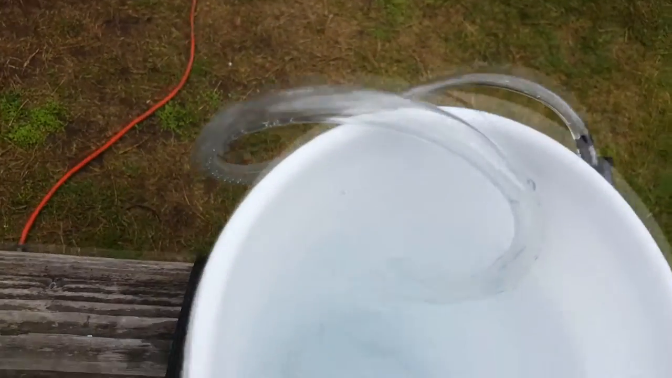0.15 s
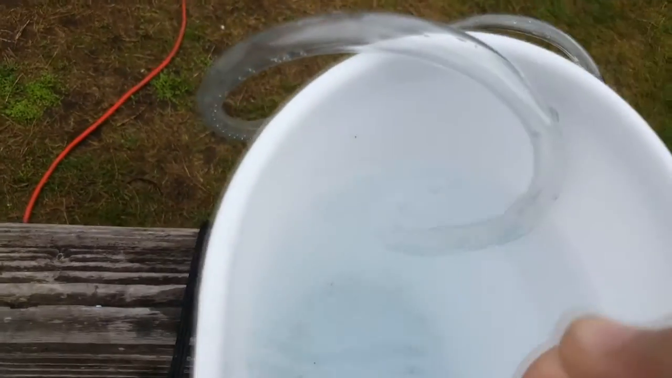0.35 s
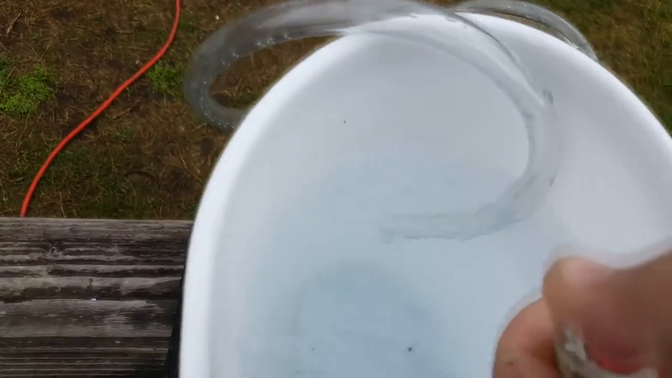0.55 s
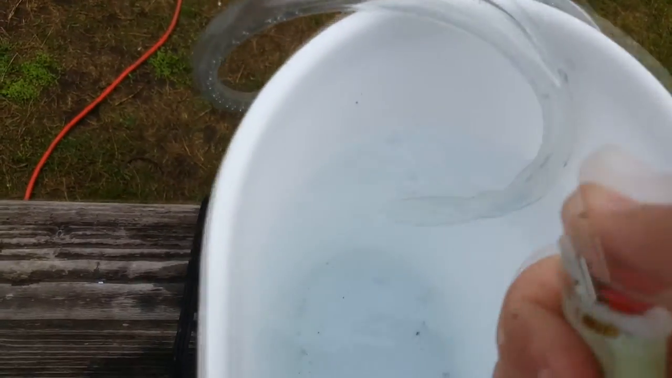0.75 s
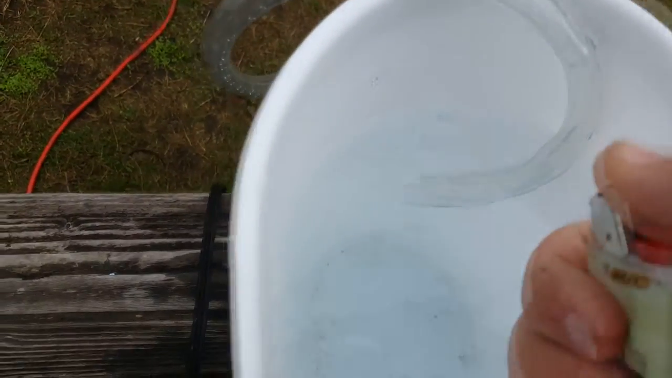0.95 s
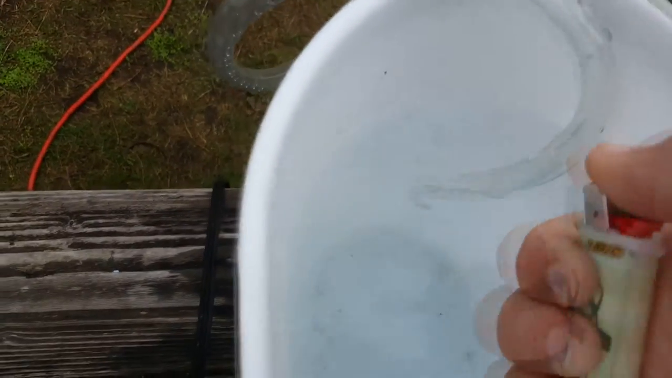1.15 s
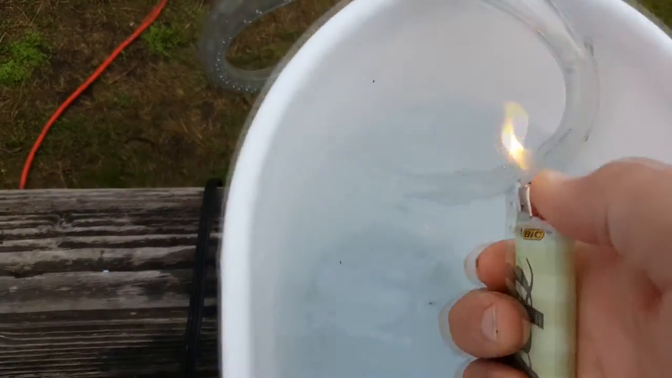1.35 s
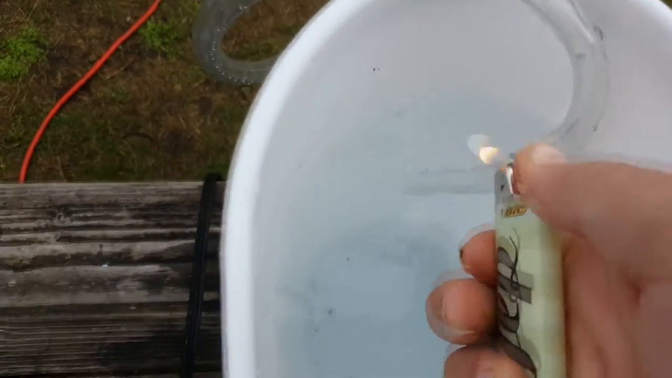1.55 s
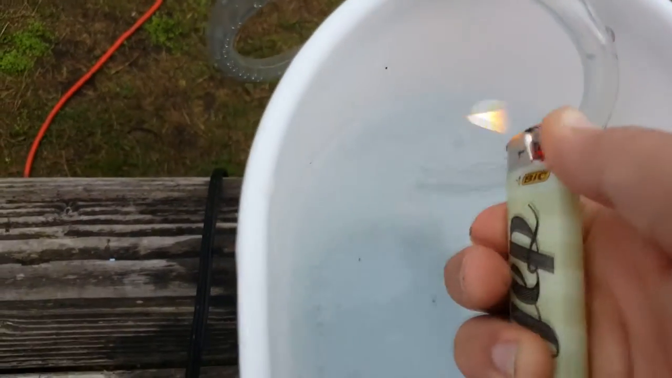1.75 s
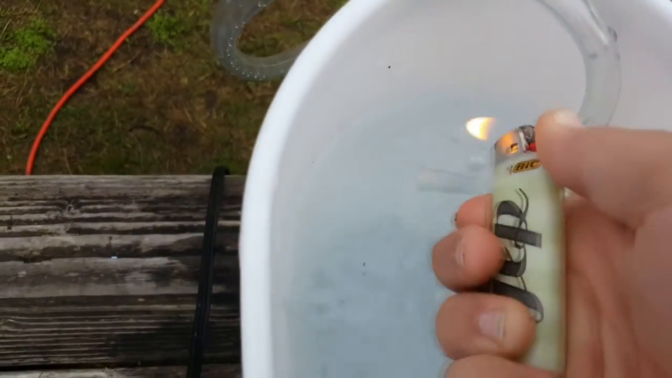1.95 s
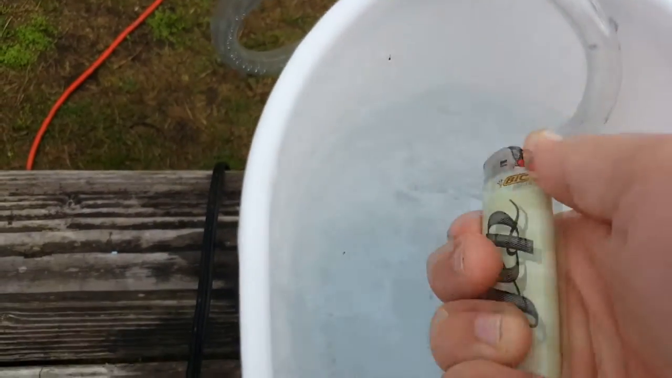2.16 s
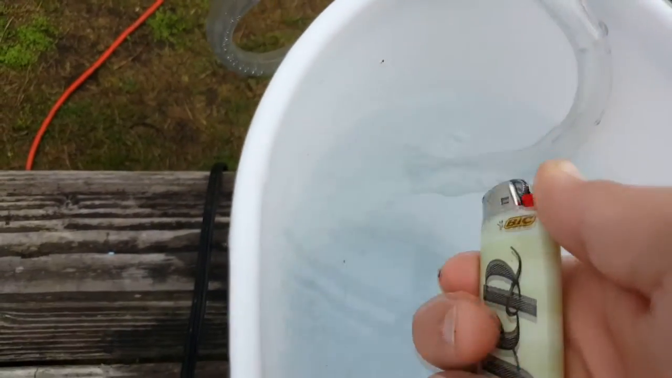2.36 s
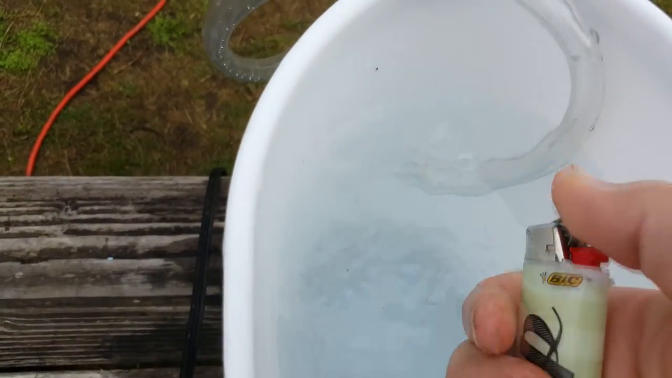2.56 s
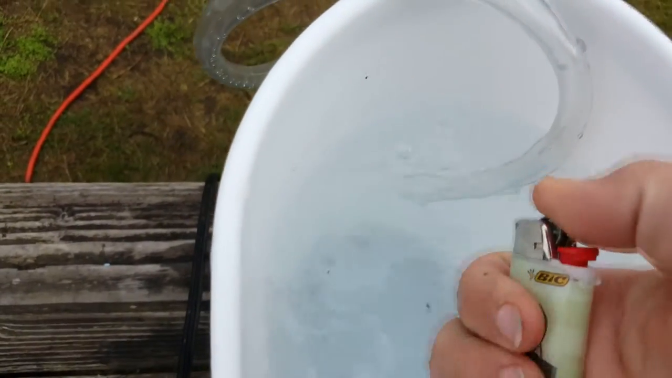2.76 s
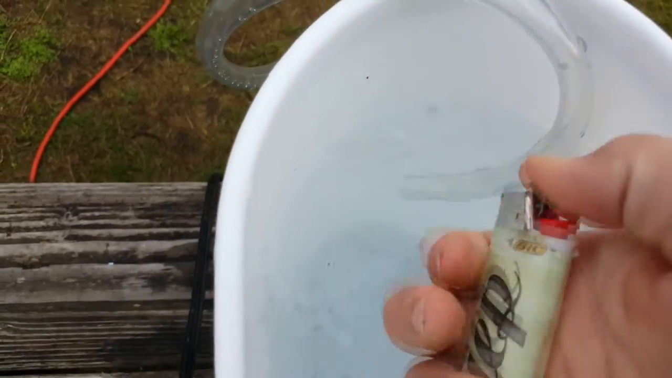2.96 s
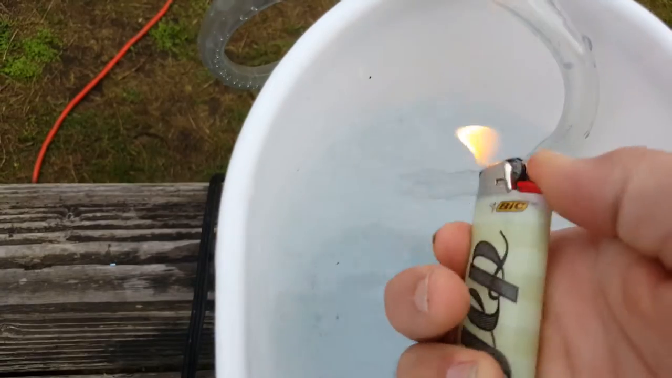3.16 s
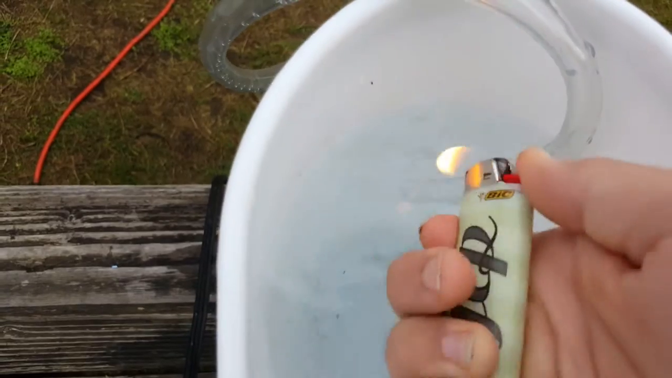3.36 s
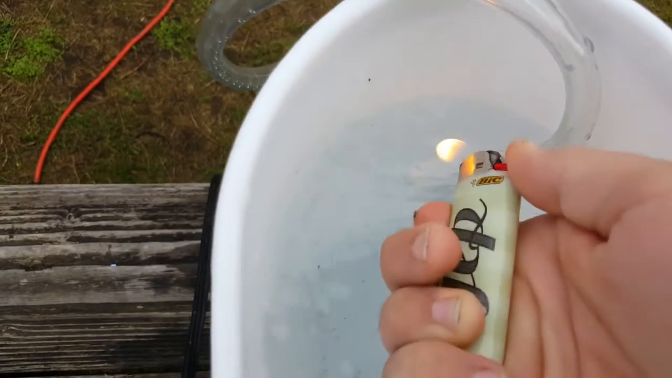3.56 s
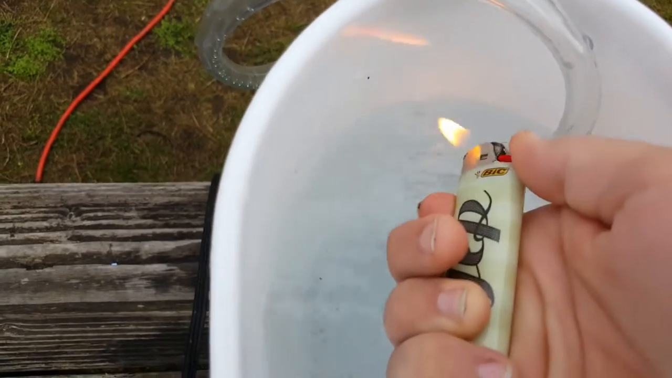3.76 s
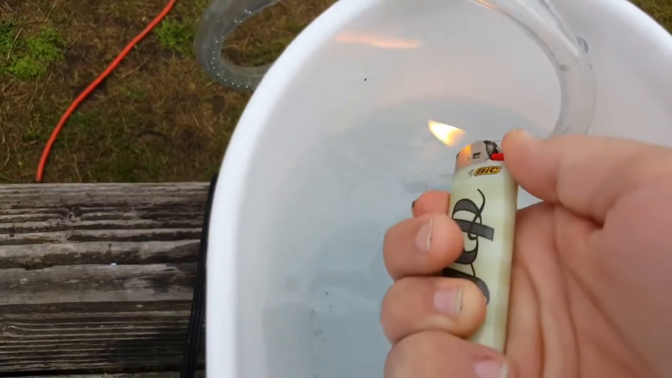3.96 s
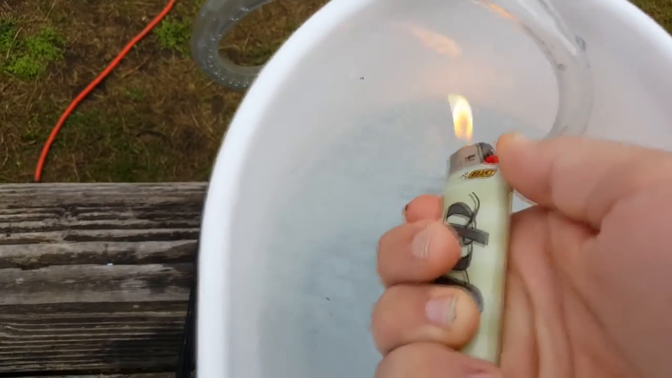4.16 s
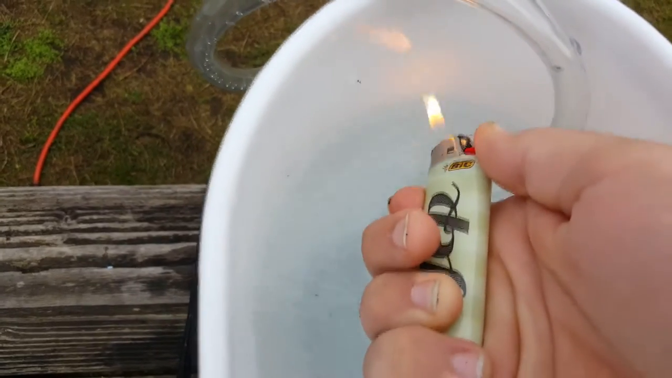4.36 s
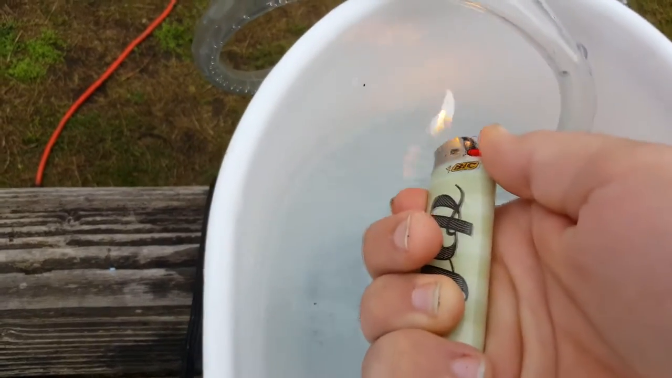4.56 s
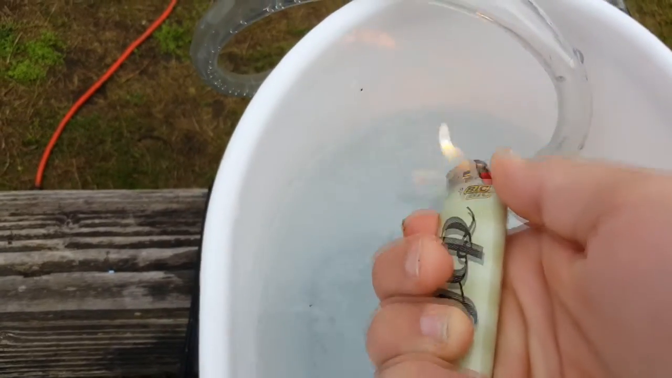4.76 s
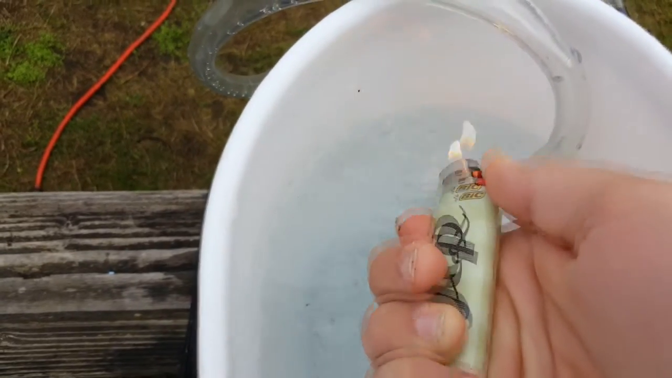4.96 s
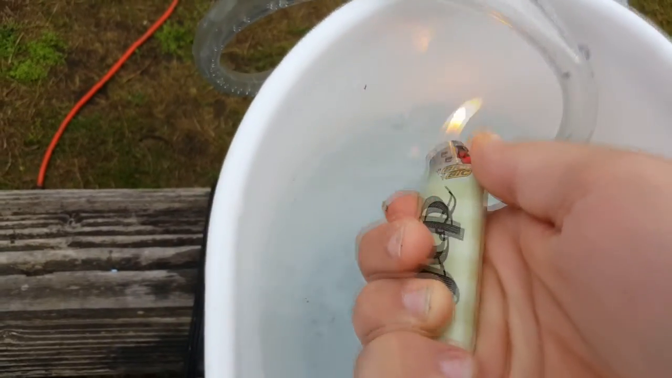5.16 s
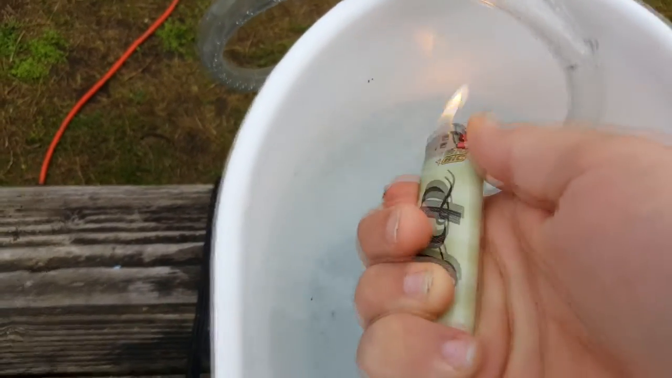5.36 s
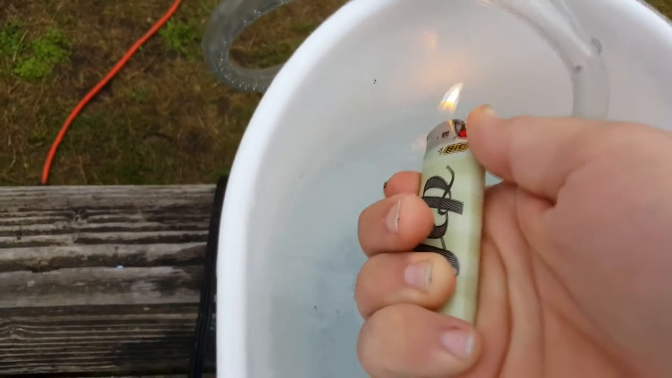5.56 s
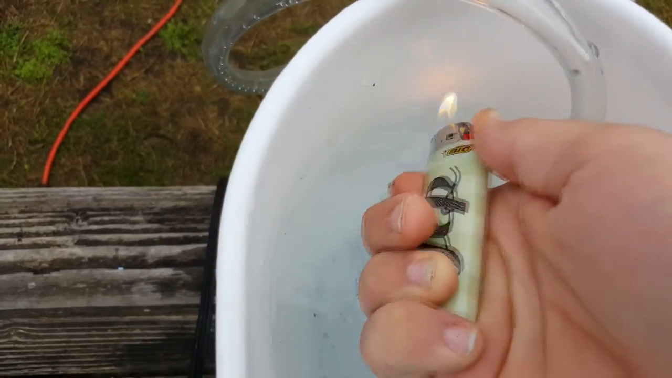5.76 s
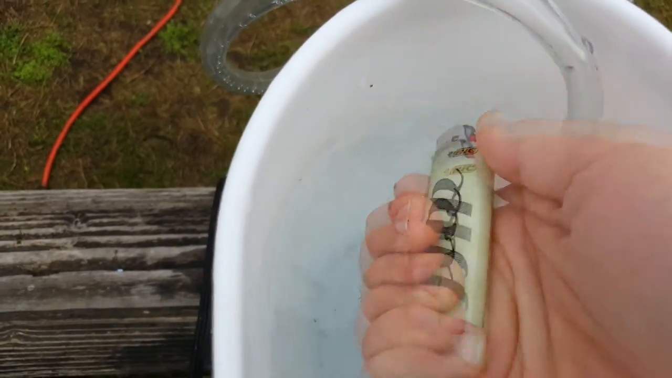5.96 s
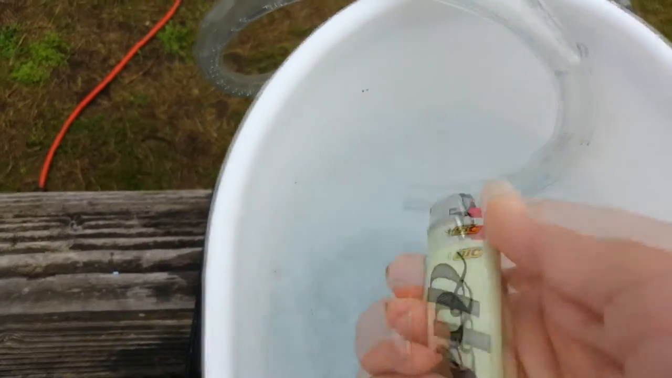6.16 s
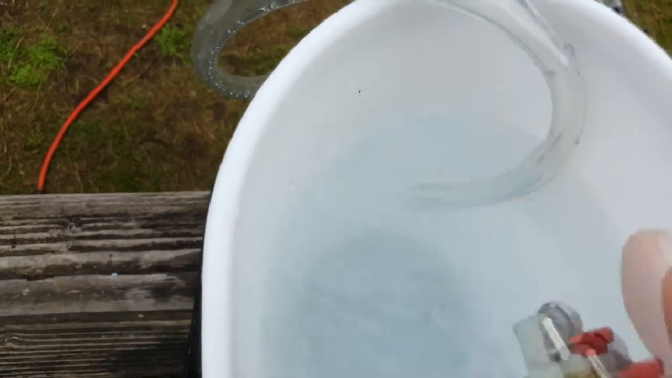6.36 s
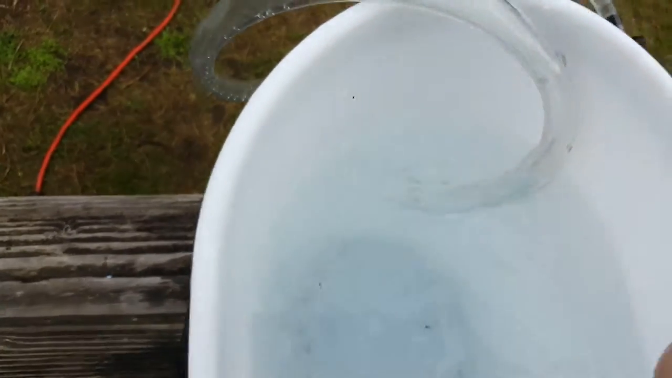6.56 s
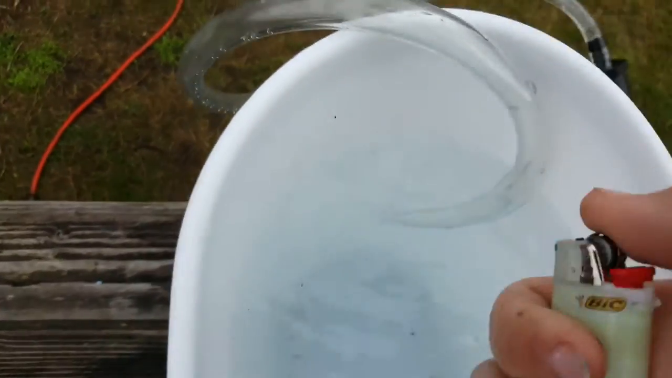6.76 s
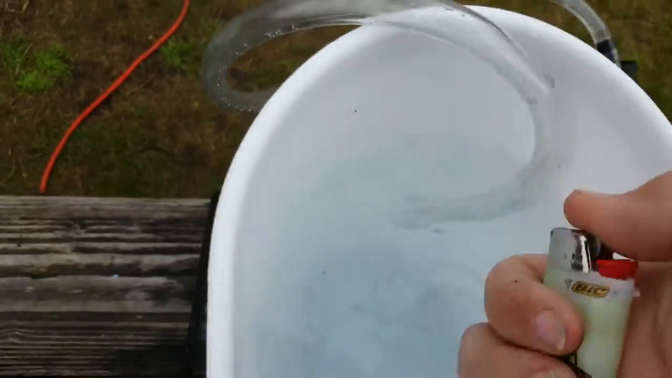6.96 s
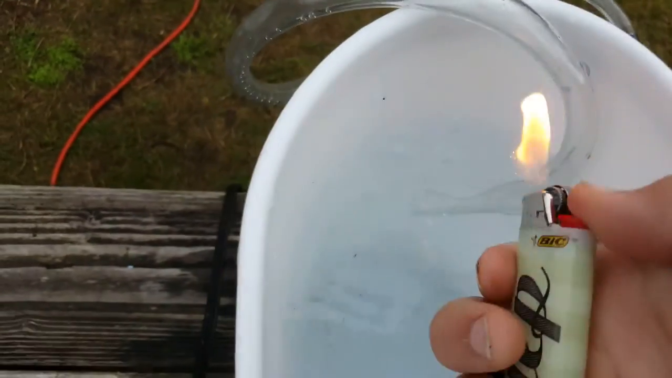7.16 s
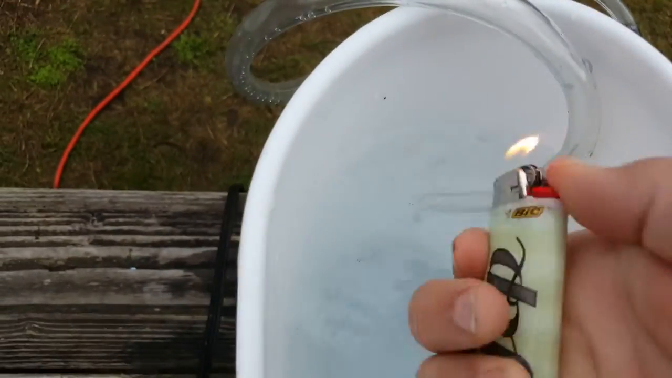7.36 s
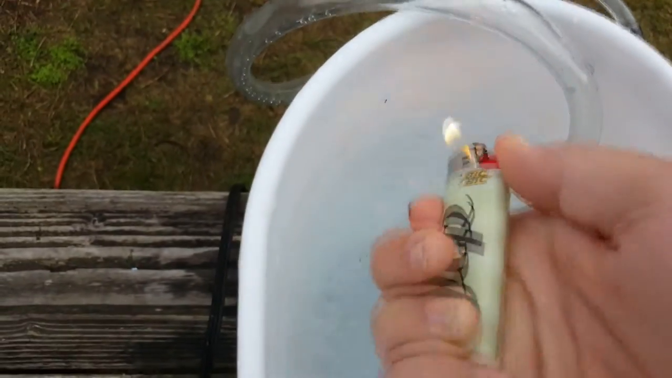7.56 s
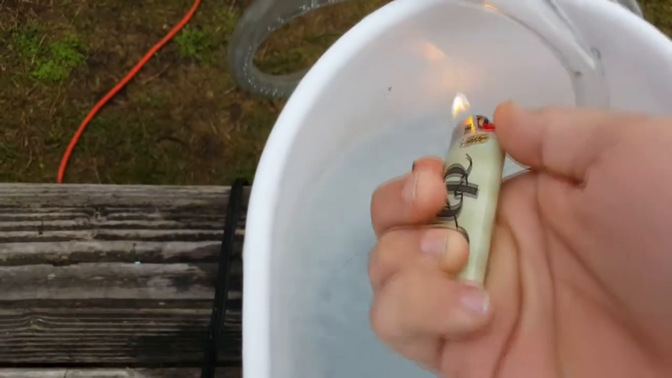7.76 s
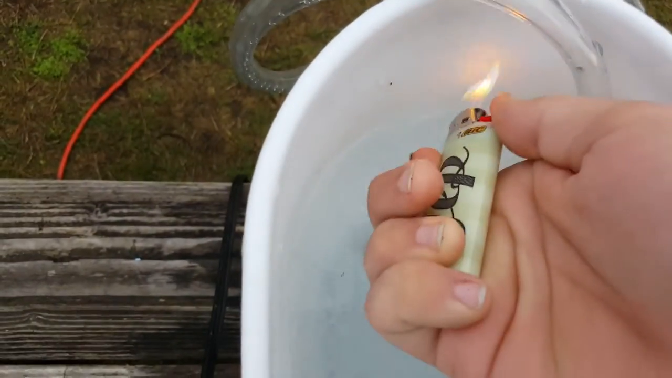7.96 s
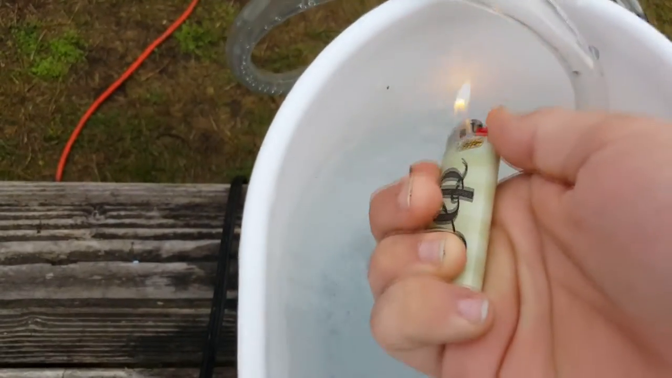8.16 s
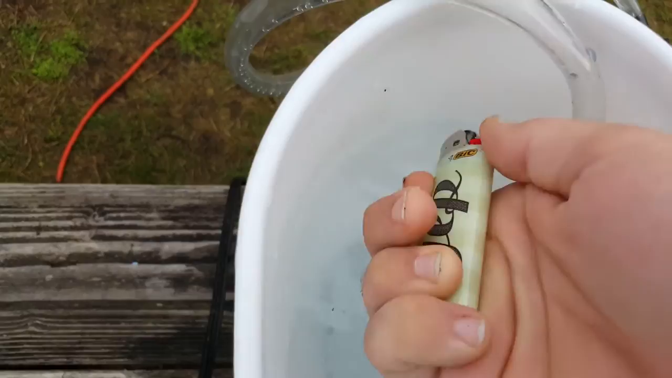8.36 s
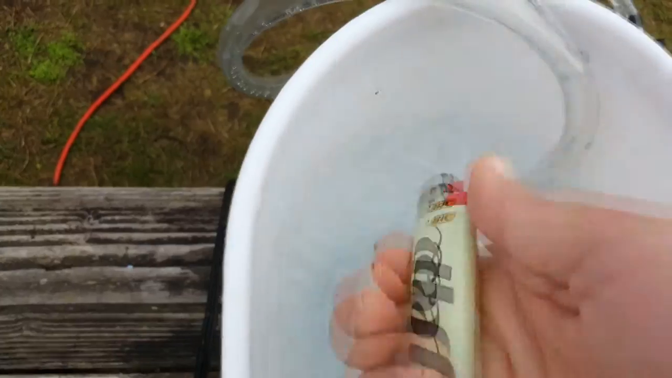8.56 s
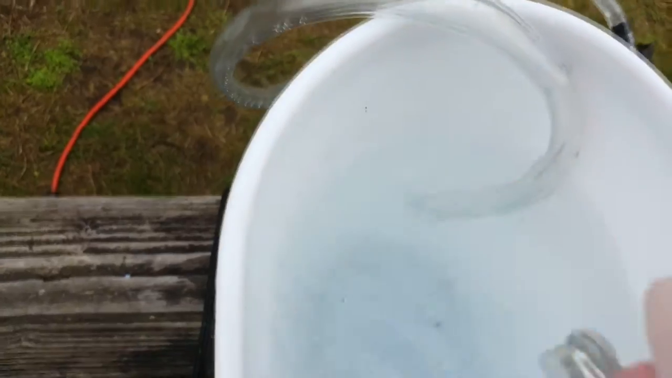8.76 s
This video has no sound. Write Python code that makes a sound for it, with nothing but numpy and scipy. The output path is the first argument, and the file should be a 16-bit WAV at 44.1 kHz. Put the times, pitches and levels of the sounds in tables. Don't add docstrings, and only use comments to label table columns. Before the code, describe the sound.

Outdoors in a yard, close stereo microphones hear a steady low generator buzz, soft airy rumble and faint, quick, regular bubbling, around five bubbles a second. A firm rub and knock come at 0.1 s, then fingers grip a plastic lighter from 0.5 to 1.1 s. The flint rasps and catches at 1.36 s with a soft puff, and a faint flame hiss follows. At 2.09 s a violent, clipped pop slaps off walls; the background ducks, then returns. A second strike at 3.05 s leads to a longer hiss, a very sharp double crack at 3.94 and 3.97 s, small ticks, and a long tearing bang at 5.9 s. Knocks at 6.05 and 6.66 s and light rubbing precede a third, brighter strike at 7.18 s. The flame hisses again until the last echoing pop at 8.32 s, after which the subdued hum slowly recovers.

```python
import sys
import numpy as np
from scipy import signal
from scipy.io import wavfile

SR = 44100
rng = np.random.default_rng(int(sys.argv[2]) if len(sys.argv) > 2 else 0)


def volts(x):
    e = np.asarray(x, float) / 20
    return 10 ** e


def to_wav(sig):
    pcm = np.clip(np.atleast_2d(sig), -1, 1) * 32767
    pcm = np.round(pcm).astype(np.int16)
    wavfile.write(sys.argv[1], SR, pcm.T)


N = 388064
T = np.arange(N) / SR

HISS_DB, AIR_DB = -79, -50.5
AIR_SPECTRUM = [(25, -16), (114, -3), (450, -22), (1070, -22.5), (2760, -29.5), (4400, -38), (8000, -41.5),
                (10800, -49)]
# [f/Hz, likeness/1]
LIKENESS = [(60, 1), (180, 1), (550, -0.02), (1650, -1.32), (4970, -0.6), (15000, -3.1)]
HUM_HZ = 120.0
HUM_LINES = [(1, -60), (2, -61.5), (2.5, -70.5), (3, -51.5), (4, -63.5), (5, -73), (6, -72.5), (7, -77),
             (9, -74), (10, -76.5)]
# [enters t/s, descent/s, leaves t/s, level/dB]
FLAMES = [
    (1.62, 0.21, 2.12, -60),
    (3.3, .55, 5.72, -53.5),
    (7.5, 0.55, 8.75, -54.5),
]
JET_FADE_S = .3
# [f/Hz, width/Hz, level/dB]
FLAME_RINGS = [(1880, 280, 0.5), (2680, 1400, -10.5), (3500, 520, -17), (7000, 300, -28), (8600, 3500, -27),
               (15000, 360, -25)]
# [t/s, bubbles gone so far/1]
BUBBLING = [(.1765, 1), (3.772, 20), (5.485, 29), (8.68, 46)]
BUBBLE_HZ, BUBBLE_DB = 490, -42
# [start t/s, attack/s, level/dB, fade/dB per s, brightness/dB]
RUBS = [
    (0.086, 0.029, -36, 472, -26),
    (.7, .15, -66, 40.5, -21),
    (.95, 0.014, -59.5, 700, -18),
    (6.485, .006, -71, 59, -12),
    (6.886, .006, -66, 350, -11),
]
# [f/Hz, width/Hz, level/dB]
RUB_LOW = [(1140, 265, 4.5), (1900, 530, 3.5), (2820, 1360, -2.5), (3800, 620, -2.5)]
RUB_HIGH = [(6550, 2100, 6.5), (13100, 4300, -30)]
# [t/s, peak level/dB, f/Hz,
# left-right/dB]
LIGHTER_TICKS = [(0.4614, -56, 4790, 5), (.6775, -44, 3500, 12), (0.6848, -35.5, 8100, 13), (0.7795, -46, 4070, 7),
                 (0.85, -51, 6500, 10), (.859, -51, 3500, 12), (1.06, -54, 6300, -3), (1.065, -44, 1950, 4),
                 (1.2665, -50, 8000, 8), (1.2724, -51, 13100, 8), (1.601, -41, 5700, 4), (1.646, -49, 5500, 12),
         (1.9929, -46, 6560, 9), (2.9916, -32.5, 10500, 6), (3.0004, -49, 7310, 8), (3.255, -47, 5370, 0),
         (3.458, -43.5, 6060, -7), (3.5975, -42, 5100, 3), (3.912, -46, 6000, 3),
         (4.6576, -54.5, 12400, 14.5), (4.81, -53, 6800, 13), (5.088, -48, 4460, 1),
         (5.3144, -50.5, 4250, 21.5), (5.3216, -34, 9900, 6), (5.5872, -50.5, 4450, 2.5),
         (6.6948, -54, 6000, 8), (7.0675, -45.5, 6300, 7), (7.0933, -43, 8720, 11),
         (7.109, -45.5, 7340, 10), (7.147, -37, 4350, 1), (7.2234, -34, 8180, 2), (7.4919, -50, 6230, 19.5),
         (7.6505, -50, 5920, 12), (7.9897, -37.5, 8600, 14.5), (8.5749, -43.5, 4170, 2)]
# [t/s, peak level/dB, f/Hz, snap level/dB, left-right/dB]
KNOCKS = [(0.0843, -26, 1070, -14.5, 19.5), (0.617, -47.5, 1220, -12, 25), (1.356, -19, 736, 1.5, 5),
          (2.398, -62, 1200, 9, 6), (3.055, -20, 516, -1, 24), (3.109, -31.5, 652, -6.5, 9),
          (6.045, -23, 1100, -5, 1), (6.656, -25, 694, -38, -7.5), (6.896, -60, 1090, -12, 3.0),
          (7.1827, -34.5, 810, 13, 13), (7.202, -25, 544, -26, 2.5), (7.208, -32, 700, -22, 1),
          (3.114, -38.5, 780, -16, 4), (7.238, -42, 603, 4, -1)]
UPPER_DB, UPPER_DB_PER_OCTAVE = 5.5, 11.5
# [t/s, level/dB, f/Hz]
PUFFS = [
    (1.358, -27.5, 146),
    (3.0597, -20, 120),
    (7.186, -22, 108),
]
# [thumb starts t/s, flint catches t/s, drag level at the catch/dB, catch level/dB,
# level just after/dB]
STRIKES = [
    (1.303, 1.361, -31.5, -33, -37),
    (2.999, 3.053, -42.5, -28, -35),
    (7.103, 7.184, -32, -22.5, -34.5),
]
# [f/Hz, width/Hz, level/dB]
WHEEL_LOW = [(885, 1730, -14), (2760, 340, 0.5), (3770, 570, 1)]
WHEEL_HIGH = [(5800, 300, -9.5), (8580, 1100, 4.5), (10800, 3600, -3.5), (12200, 1500, 0.5)]
TEETH = np.array([0, .43, .7])
TOOTH_DB_PER_S = 334
DRAG_DB_PER_S, CATCH_RISE_S, CATCH_FALL_S, SPIN_DB_PER_S = 306, 0.0022, 0.002, 383
WHEEL_BRIGHT_DB, BRIGHTEN_DB_PER_S, SPIN_BRIGHT_DB, SPIN_BRIGHTEN_DB_PER_S = 1.5, 190, -8.5, 133
# [t/s, tearing level/dB, tearing length/s, shock level/dB, shock f/Hz]
POPS = [
    (2.0862, 15, 0.015, 8.5, 528.8),
    (3.9425, -10.5, 0.0054, 12.5, 1119),
    (3.9734, 4.5, 0.0062, 4.5, 1200),
    (5.8949, 17.5, 0.012, 5.5, 1280),
    (8.3190, 12, 0.011, 11.5, 1300),
]
# [water thud level/dB, thud f/Hz, echo level/dB,
# share by way of the water surface/0-1, echo brightness/dB]
AFTER = [(5, 160, -2.5, 0.3, 3.5), (-3.5, 350, -24.5, 0.5, -14), (-8.5, 280, -3.5, 0.2, -0.5),
         (0, 330, 2, 0.2, 1.95), (-9.5, 130, 0, 0, -6.5)]
# [f/Hz, width/Hz, level/dB]
BUCKET = [(295, 230, -4), (754, 500, -2), (1410, 1400, 10.5), (2780, 260, -4), (4200, 1400, -13),
          (9180, 2500, -17.5)]
BOUNCE_S = .00147
# [delay/s, left level/dB, right level/dB]
ECHOES = [(.016, 1.5, 5.5), (0.0253, 12.5, 9), (.031, 7, 5.5), (0.041, 0.5, 3), (0.057, 6, 5.5),
          (0.116, 0, 3)]
ECHO_SMEAR_S, ECHO_PAN_DB = .0045, 1.03
# [f/Hz, t60/s, level/dB]
YARD_DECAY = [(300, 0.19, -16.5), (700, 0.57, -5), (1325, 0.74, 4), (3024, 0.69, 3.5), (5600, 0.46, 3),
              (9000, 0.3, 4.5), (13000, 0.21, 4.5)]
# [f/Hz, width/Hz, level/dB]
YARD_RINGS = [(560, 430, -8), (1200, 120, 2), (1950, 130, 0.5), (2510, 360, -3), (3340, 1300, -9),
              (4450, 900, -11.5), (5700, 1800, -18), (8700, 1000, -16), (12900, 3500, -20.5)]
# [t/s, depth/dB, hold/s]
DUCKS = [
    (2.09, 16, 0.68),
    (3.06, 4, .1),
    (3.95, 14, .65),
    (5.9, 16.5, .66),
    (8.32, 15, .6),
]
SINK_S, SINK_SHAPE, RECOVER_S, REST_DB = .09, 2, .33, -0.27


def rms_one(x):
    return x / np.sqrt(np.mean(x ** 2) + 1e-20)


def at_hz(points, hz):
    table_hz, value = np.transpose(points)
    return np.interp(np.log(hz), np.log(table_hz), value)


def band(x, low_hz, high_hz):
    edges = [low_hz, min(high_hz, .48 * SR)]
    return signal.sosfilt(signal.butter(2, edges, "band", fs=SR, output="sos"), x)


def drift(rate):
    r = np.exp(-80 * np.pi * rate / SR)
    slow = signal.lfilter([1], [1, -2 * r, r * r], rng.standard_normal(N // 40 + 2002))[2000:]
    return np.interp(np.arange(N) / 40, np.arange(len(slow)), rms_one(slow))


def resonate(x, peaks):
    out = 0
    for k, (hz, width_hz, db) in enumerate(peaks):
        r = np.exp(-np.pi * width_hz / SR)
        push = np.array([1, 0, -1]) * (1 - r * r) / 2
        ring = [1, -2 * r * np.cos(2 * np.pi * hz / SR), r * r]
        out = out + (-1) ** k * volts(db) * signal.lfilter(push, ring, x)
    return out


def pan(pan_db):
    return volts([[pan_db / 2], [-pan_db / 2]])


def add(out, s, shape, pan_db):
    i = round(s * SR)
    out[:, i:i + shape.shape[-1]] += (shape * pan(pan_db))[:, :N - i]


def gain_db(s):
    out = REST_DB
    for start, depth_db, hold in DUCKS:
        sunk = 1 - np.exp(-(np.maximum(s - start, 0) / SINK_S) ** SINK_SHAPE)
        recovery = np.exp(-np.maximum(s - start - hold, 0) / RECOVER_S)
        out = out + 20 * np.log10(1 - (1 - volts(-depth_db * sunk)) * recovery)
    return out


def at_source(s, db):
    return volts(db - gain_db(s))


def scrape(low_level, high_level, low_peaks, high_peaks, grit_db, pan_db):
    roughness = np.minimum(rng.exponential(1, N), 4) + .45 * drift(220)
    grains = rng.standard_normal((3, N)) * volts(grit_db * roughness)
    grains = grains[0] + 1.77 * grains[1:]
    low = rms_one(resonate(grains, low_peaks))
    high = rms_one(resonate(grains, high_peaks))
    return (low_level * low + high_level * high) * volts(-gain_db(T)) * pan(pan_db)


def bounce(x, share, again):
    lag = round(BOUNCE_S * SR)
    late = band(np.pad(x, ((0, 0), (lag, 0)))[:, :-lag], 200, 5000)
    round_trip = np.r_[1, np.zeros(lag - 1), -again]
    return signal.lfilter([1], round_trip, x + np.clip(share, 0, 1) * late)


def hiss():
    return volts(HISS_DB) * rms_one(band(rng.standard_normal((2, N)), 12800, 20000))


def air():
    out, edges = 0, 25 * 2 ** np.arange(0, 9.6, .5)
    white = rng.standard_normal((2, 2, N))
    for k, (low, high) in enumerate(zip(edges, edges[1:])):
        mid, side = band(white[k % 2], low, high)
        hz = np.sqrt(low * high)
        alike = np.clip(at_hz(LIKENESS, hz), 0, 1)
        patchy_db = .7 + 2.5 / (1 + hz / 200)
        level = volts(at_hz(AIR_SPECTRUM, hz) + patchy_db * drift(6))
        out = out + level * (np.sqrt(1 + alike) * mid + np.sqrt(1 - alike) * side * [[1], [-1]])
    return volts(AIR_DB) * rms_one(out)


def hum():
    out = 0
    for multiple, db in HUM_LINES:
        level = volts(db + 3 + .9 * drift(3))
        out = out + level * np.sin(2 * np.pi * (multiple * HUM_HZ * T + rng.random()))
    return out * pan(-1.6)


def jet():
    level = 0
    for enters, descent, leaves, db in FLAMES:
        fade = np.exp(-np.maximum(T - leaves, 0) / JET_FADE_S)
        level = level + volts(db) * np.clip((T - enters) / descent, 0, 1) * fade
    gas = resonate(rng.standard_normal((2, N)), FLAME_RINGS)
    return level * volts(drift(8)) * rms_one(bounce(gas, .6, again=0))


def bubbles():
    out, t = np.zeros((2, N)), np.arange(1300) / SR
    times, gone = np.transpose(BUBBLING)
    releases = np.interp(np.arange(1, gone[-1] + 1), gone, times)
    chance = rng.standard_normal((int(gone[-1]), 3))
    for s, (late, size, loud) in zip(releases, chance):
        turns = BUBBLE_HZ * (1 + .03 * size) * t
        shape = np.sin(2 * np.pi * turns) * np.exp(-t / .007)
        shape = shape + .7 * np.sin(2.7 * np.pi * turns) * np.exp(-t / .004)
        onset = 1 - np.exp(-t / .001)
        add(out, s + .001 * late, volts(BUBBLE_DB + 1.5 * loud) * shape * onset, 0)
    return out


def fingers():
    low = high = 0
    for start, attack, db, fade, bright_db in RUBS:
        swell = np.clip((T - start) / attack, 0, 1)
        rub = swell * volts(db - fade * np.maximum(T - start - attack, 0))
        low = low + rub
        high = high + rub * volts(bright_db)
    return scrape(low, high, RUB_LOW, RUB_HIGH, grit_db=6.0, pan_db=18.0)


def ticks():
    out, t = np.zeros((2, N)), np.arange(400) / SR
    for s, db, hz, pan_db in LIGHTER_TICKS:
        ring = [(hz, 0.47 * hz, 0)]
        scratch = rng.standard_normal((2, len(t))) * np.exp(-t / 0.0017)
        plastic = resonate(scratch, [(3090, 1800, -6.5)])
        shape = resonate(resonate(scratch, ring), ring) + plastic
        add(out, s, at_source(s, db + 1.5) * shape / np.abs(shape).max(), pan_db)
    return out


def knocks():
    out, t = np.zeros((2, N)), np.arange(900) / SR
    for s, db, hz, snap_db, pan_db in KNOCKS:
        upper_db = UPPER_DB + UPPER_DB_PER_OCTAVE * np.log2(hz / 1000)
        snap = band(rng.standard_normal((2, len(t))) * np.exp(-t / 0.00147), 5000, 14000)
        body = np.sin(2 * np.pi * hz * t) * np.exp(-t / 0.0013) * np.minimum(t / 0.00028, 1)
        upper = -np.sin(2 * np.pi * 2300 * t) * np.exp(-(t / 0.00044) ** 2)
        upper = upper * np.minimum(t / 0.00031, 1)
        knock = body + volts(upper_db) * upper + volts(snap_db + 1.5) * snap
        add(out, s + .0015, at_source(s, db - 1.0) * knock, pan_db)
    return out


def puffs():
    out, t = np.zeros((2, N)), np.arange(900) / SR
    for s, db, hz in PUFFS:
        add(out, s, at_source(s, db) * np.cos(2 * np.pi * hz * t) * np.exp(-t / 0.0028), 4.0)
    return out


def flint():
    level, bright_db = 0, np.zeros(N)
    for start, catch, drag_db, catch_db, spin_db in STRIKES:
        before, after = np.maximum(catch - T, 0), np.maximum(T - catch, 0)
        bites = start + TEETH * (catch - start)
        biting = T - bites[np.maximum(np.searchsorted(bites, T) - 1, 0)]
        drag = volts(drag_db - DRAG_DB_PER_S * before - TOOTH_DB_PER_S * np.abs(biting))
        wheel = np.where(T < catch, drag, volts(spin_db - SPIN_DB_PER_S * after))
        spark = volts(catch_db) * np.exp(-before / CATCH_RISE_S - after / CATCH_FALL_S)
        level = level + (T > start) * (wheel + spark)
        drag_bright_db = WHEEL_BRIGHT_DB - BRIGHTEN_DB_PER_S * before
        spin_bright_db = SPIN_BRIGHT_DB + SPIN_BRIGHTEN_DB_PER_S * after
        stroke_bright_db = np.where(after < 2 * CATCH_FALL_S, drag_bright_db, spin_bright_db)
        bright_db = np.where(T > start, np.minimum(stroke_bright_db, 6), bright_db)
    return scrape(level, level * volts(bright_db), WHEEL_LOW, WHEEL_HIGH, grit_db=5.0, pan_db=5.5)


def yard(bright_db):
    t = np.arange(round(.7 * SR)) / SR
    clumps = volts(1.2 * drift(90)[:len(t)])
    returns = rng.standard_normal((2, len(t))) * clumps
    out = 0
    for k, (hz, t60, db) in enumerate(YARD_DECAY):
        out = out + (-1) ** k * volts(db - 60 * t / t60) * band(returns, hz / 1.4, hz * 1.4)
    out = out * np.clip((t - .007) / 0.026, 0, 1) ** 1.5
    for delay, left_db, right_db in ECHOES:
        late = np.maximum(t - delay, 0)
        smear = (late > 0) * np.exp(-late / ECHO_SMEAR_S)
        out += volts([[left_db], [right_db]]) * band(returns * smear, 270, 4300)
    rings = [(hz, width_hz, db + bright_db * (hz > 4000)) for hz, width_hz, db in YARD_RINGS]
    return volts(-6.5) * resonate(out, rings)


def pops():
    out, t = np.zeros((2, N)), np.arange(round(.06 * SR)) / SR
    ports = t * np.array([[1.06], [.94]])
    for pop, after in zip(POPS, AFTER):
        s, tear_db, length, shock_db, shock_hz = pop
        thud_db, thud_hz, echo_db, share, bright_db = after
        shared, *own = rng.standard_normal((3, len(t)))
        burning = volts(-50 * (t / length) ** 2)
        burning += volts(-25.5) * np.exp(-t / 0.0048)
        burst = (shared + 1.6 * np.array(own)) * np.clip(t / 0.0013 - .5, 0, 1) * burning
        tear = resonate(burst, BUCKET)
        turns = shock_hz * ports
        shock = np.sin(2 * np.pi * turns) * np.minimum(turns / 0.3, 1)
        shock = shock * np.exp(-(turns / .8) ** 2)
        thud = np.sin(2 * np.pi * thud_hz * ports + np.array([[.25], [-.25]]))
        thud = thud * np.minimum(t / .001, 1) * np.exp(-t / .0045)
        blast = volts(tear_db) * tear / np.abs(tear).max() + volts(shock_db) * shock
        add(out, s, bounce(blast, share=0.41, again=0.12) + volts(thud_db) * thud, 1.5)
        add(out, s, volts(echo_db) * bounce(yard(bright_db), share, again=0), ECHO_PAN_DB)
    return out


def scene():
    background = hiss() + air() + hum()
    bucket = jet() + bubbles()
    lighter = fingers() + ticks() + knocks() + puffs() + flint()
    return background + bucket + lighter + pops()


def low_pass(x):
    return signal.sosfilt(signal.butter(12, 16470, fs=SR, output="sos"), x)


def record(dry):
    dry = signal.sosfilt(signal.butter(2, 50, "high", fs=SR, output="sos"), dry)
    dry = signal.sosfilt(signal.cheby2(14, 40, 16200, fs=SR, output="sos"), dry)
    mix = np.clip(dry * volts(gain_db(T)), -.93, .93)
    return low_pass(mix)


dry = scene()
out = record(dry)
to_wav(out)
```